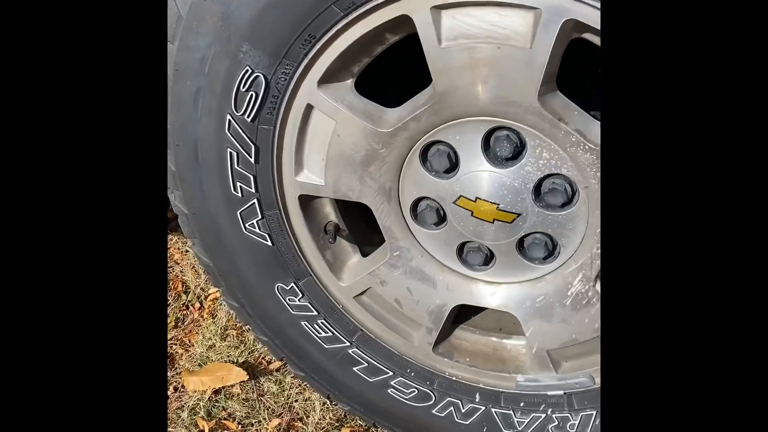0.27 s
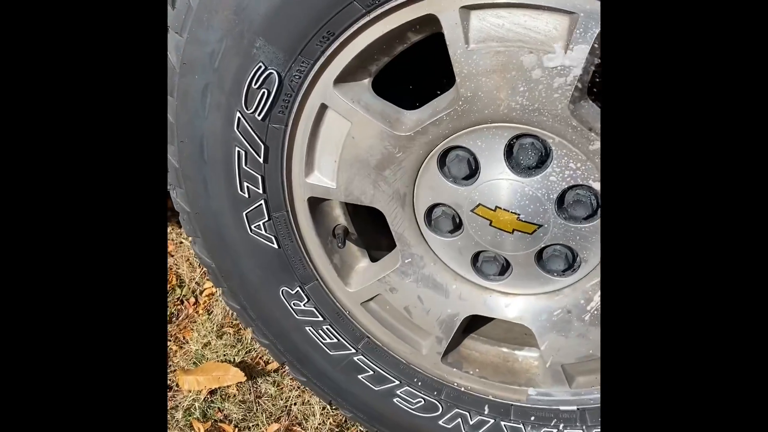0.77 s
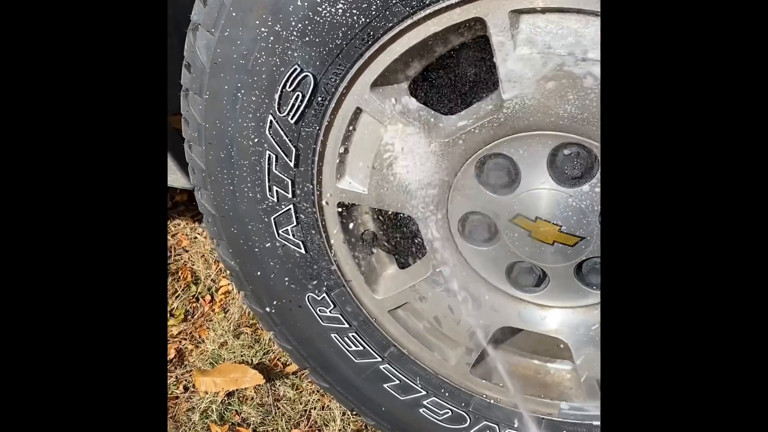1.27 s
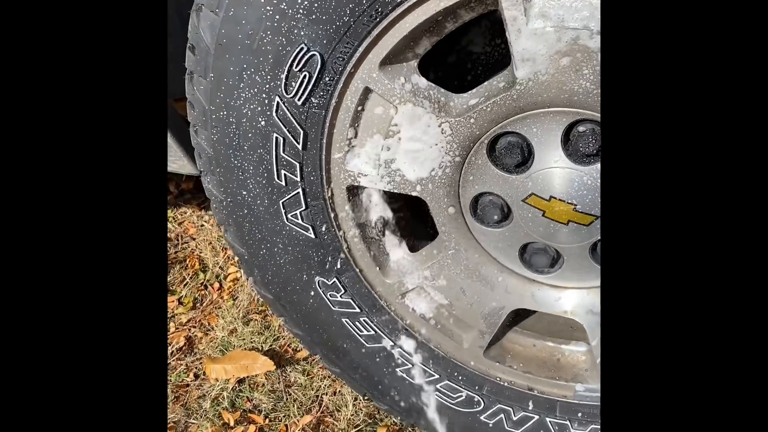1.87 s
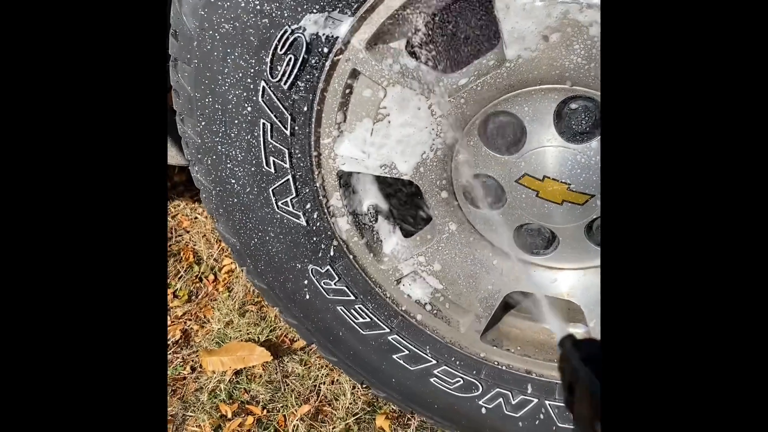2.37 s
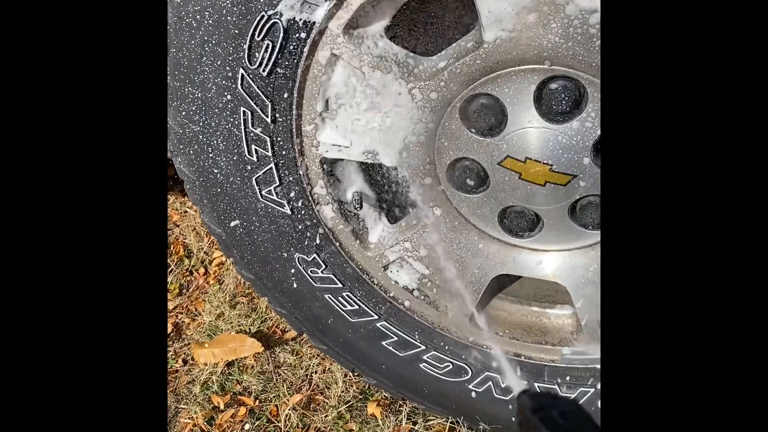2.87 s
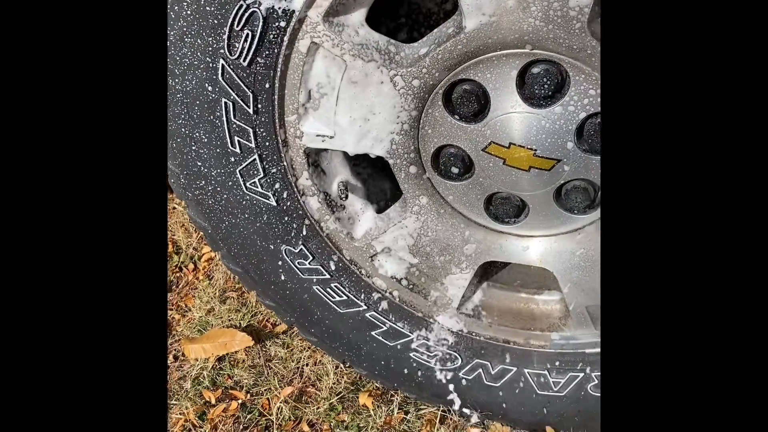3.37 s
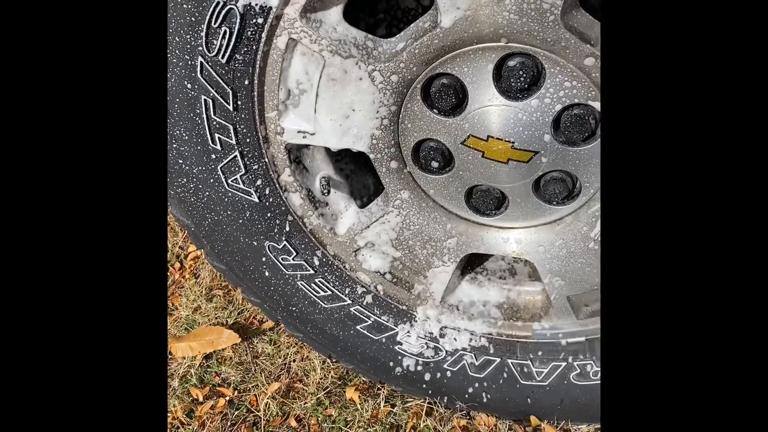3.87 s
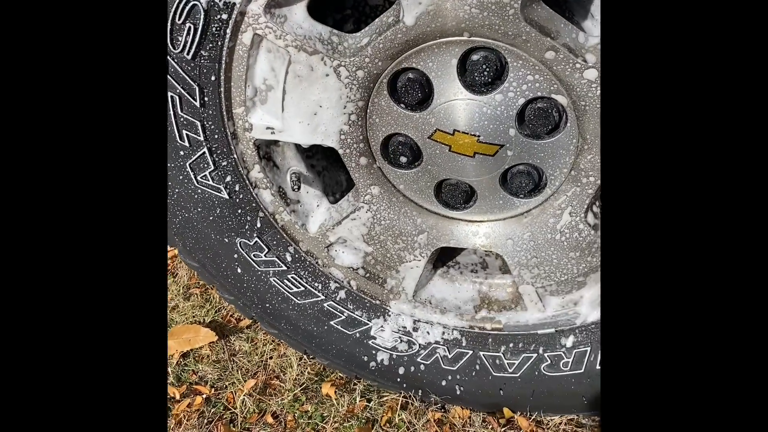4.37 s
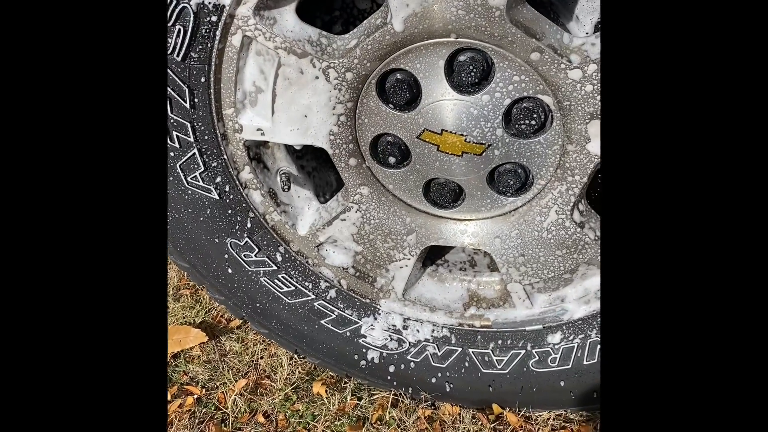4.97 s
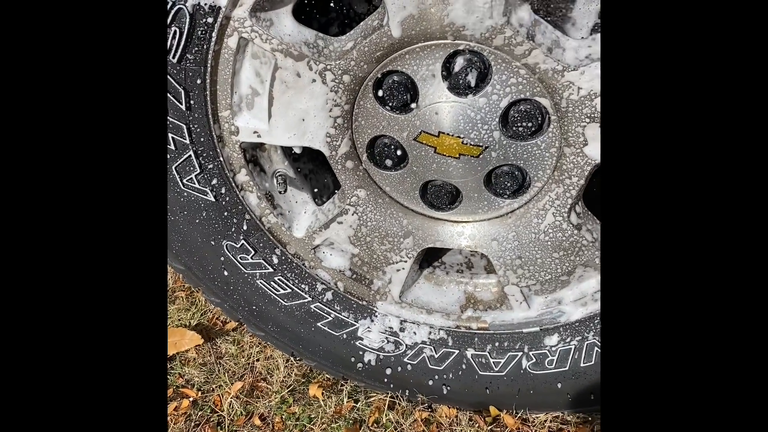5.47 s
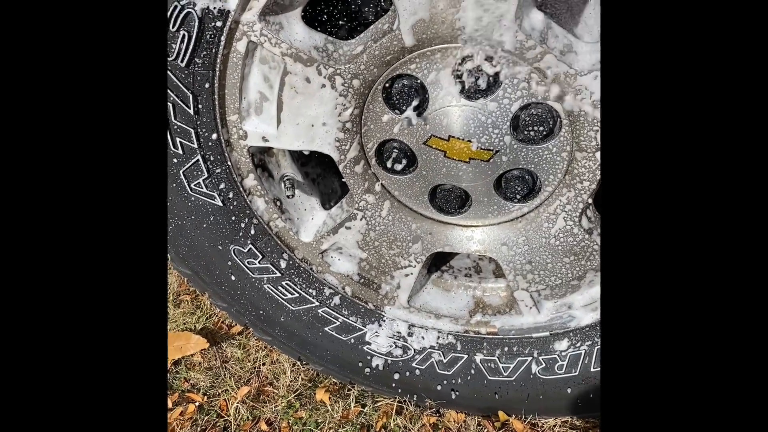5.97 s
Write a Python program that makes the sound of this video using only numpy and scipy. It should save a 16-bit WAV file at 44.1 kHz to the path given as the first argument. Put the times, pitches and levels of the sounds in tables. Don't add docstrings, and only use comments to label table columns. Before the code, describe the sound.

Steady, quick spray squirts fill the foreground from start to end: crisp bursts of hiss, grainy droplets hitting a car wheel, hollow plastic knocks and bright little ticks as the trigger springs back. Foam fizzes softly in the gaps. Behind, a low engine rumble swells in the second half with some tyre roar around the middle. Wind buffets the stereo phone microphones, strongest in the first second. Dry, open-air, close sound.

```python
import sys
import numpy as np
from scipy import signal
from scipy.fft import rfft, irfft
from scipy.io import wavfile
from scipy.ndimage import uniform_filter1d

SR = 44100
rng = np.random.default_rng(int(sys.argv[2]) if len(sys.argv) > 2 else 0)


def log_audio(samples):
    frames = np.atleast_2d(samples).T
    limited = np.clip(frames, -1, 1)
    pcm = np.round(limited * 32767).astype(np.int16)
    wavfile.write(sys.argv[1], SR, pcm)


def volts(x):
    e = np.asarray(x, float) / 20
    return 10 ** e


N = 274213


def rms_one(x):
    return x / np.sqrt(np.mean(x ** 2) + 1e-20)


def in_time(rows):
    s, *columns = np.transpose(rows)
    return [np.interp(np.arange(N) / SR, s, c) for c in columns]


def on_bins(points):
    hz, value = np.transpose(points)
    return np.interp(np.log(np.fft.rfftfreq(N, 1 / SR) + 1), np.log(hz), value)


def colour(x, spectrum):
    below, above = (spectrum[0][0] / 2, -80), (spectrum[-1][0] * 2, -80)
    closed = [below] + list(spectrum) + [above]
    return rms_one(irfft(rfft(x) * volts(on_bins(closed)), N))


def drift(rate):
    r = np.exp(-16 * np.pi * rate / SR)
    draws = rng.standard_normal(N // 8 + 4002)
    slow = signal.lfilter([1], [1, -2 * r, r * r], draws)[4000:]
    return np.interp(np.arange(N) / 8, np.arange(len(slow)), rms_one(slow))


# pitch_hz, likeness (0-1)
PORT_LIKENESS = [(40, 0.98), (100, 0.988), (250, 0.95), (700, 0.67), (1100, 0.68), (1900, 0.74),
                 (2800, 0.2), (3500, 0.45), (5000, 0.71), (6200, 0.97), (7400, 0.97), (9000, 0.66),
                 (10500, 0.73), (12000, 0.42), (13600, 1), (16000, 0.53)]


def pair():
    mid, side = rfft(rng.standard_normal((2, N)))
    alike = np.clip(on_bins(PORT_LIKENESS), 0, 1)
    return irfft(np.sqrt(1 + alike) * mid + np.sqrt(1 - alike) * side * [[1], [-1]], N)


def narrow(hz, width_hz):
    edges_hz = [hz - width_hz / 2, hz + width_hz / 2]
    band = signal.butter(2, edges_hz, "band", fs=SR, output="sos")
    return rms_one(signal.sosfilt(band, pair()))


def swell(s, width_s, far_db, near_db, power=2):
    return far_db + (near_db - far_db) * np.exp(-((np.arange(N) / SR - s) / width_s) ** power)


def even(x, size, slack):
    wander = uniform_filter1d(np.mean(x ** 2, axis=0), size=size)
    return x / np.sqrt((wander + slack) / (1 + slack))


# start_s, pressure_rise_s, hold_s, hiss_db
SQUIRTS = [(0.0, 0.00032, 0.081, -26), (0.199, 0.036, 0.1, -24), (0.45, 0.042, 0.083, -23),
           (0.679, 0.032, 0.099, -24), (0.917, 0.024, 0.091, -22.5), (1.129, 0.036, 0.087, -22.5),
           (1.364, 0.023, 0.081, -24.5), (1.575, 0.025, 0.1, -25.0), (1.811, 0.039, 0.073, -23),
           (2.04, 0.024, 0.09, -23), (2.251, 0.048, 0.09, -23), (2.492, 0.049, 0.057, -21.5),
           (2.727, 0.038, 0.099, -23), (2.961, 0.039, 0.08, -23.5), (3.176, 0.058, 0.073, -26),
           (3.408, 0.047, 0.09, -26), (3.656, 0.029, 0.09, -27), (3.871, 0.053, 0.065, -25),
           (4.095, 0.054, 0.076, -26), (4.345, 0.027, 0.095, -25.5), (4.595, 0.03, 0.104, -24.5),
           (4.838, 0.032, 0.103, -25), (5.098, 0.022, 0.1, -24.5), (5.324, 0.029, 0.09, -24.5),
           (5.548, 0.044, 0.097, -27.5), (5.802, 0.032, 0.089, -24), (6.033, 0.055, 0.085, -23.5)]
# extra_shut_off_s, foam_left_db
AFTER_SQUIRT = [(-.004, -2), (-.003, 0), (0.001, -2), (0.001, 0), (0.001, 0), (0.001, 0), (0.001, 0),
                (-.004, 0), (-.006, 0), (-.006, 0), (-.003, 0), (-.004, 0), (0.001, -3), (0.001, 0),
                (0.001, 0), (-.002, 0), (0.001, 0), (0.001, 0), (0.001, 0), (-.003, 0), (-.004, -4),
                (0.001, 0), (-.002, 0), (-.008, -2), (0.001, -4), (-.004, 0), (0.001, 0)]


def fall_s():
    hold_s = np.transpose(SQUIRTS)[2]
    return 0.044 - 0.66 * (hold_s - 0.079) + np.transpose(AFTER_SQUIRT)[0]


# time_s, spatter_db (re the hiss)
AIM = [
    (0, -13.5),
    (.5, -18.5),
    (1.7, -16),
    (3.5, -12.5),
    (4.7, -15.5),
    (5.5, -10),
    (6.22, -10.5),
]


def pressure(start_db, shoulder_db, dribble_s, dribble_db):
    t, shape = np.arange(N) / SR, np.full(N, -70.)
    for (s, rise, hold, _), fall in zip(SQUIRTS, fall_s()):
        end = s + rise + hold
        shut = end + fall
        corners = [s - .003, s, s + rise, s + rise + hold / 2,
                   end, shut, shut + dribble_s, shut + 2 * dribble_s]
        levels = [-60, start_db, shoulder_db, 0, shoulder_db, start_db, dribble_db, -50]
        a, b = max(int((s - .01) * SR), 0), int(corners[-1] * SR)
        shape[a:b] = np.maximum(shape[a:b], np.interp(t[a:b], corners, levels))
    starts, *_, top_db = np.transpose(SQUIRTS)
    which = np.clip(np.searchsorted(starts - .01, t) - 1, 0, None)
    return uniform_filter1d(shape, size=70), top_db[which], in_time(AIM)[0]


# pitch_hz, density_db (per Hz)
HISS = [(3000, -16), (5000, -10), (6500, -4.5), (8800, 0), (11000, -3.5), (13500, -6), (15300, -2),
        (16500, -8)]
# pitch_hz, density_db (per Hz)
SPATTER = [(700, -14), (1500, 5.5), (2500, 11.5), (3500, 6), (4700, 14), (6000, 14), (8000, -20)]


def jet():
    t = np.arange(N) / SR
    shape_db, top_db, spatter_db = pressure(start_db=-22.0, shoulder_db=-1.5, dribble_s=0.011, dribble_db=-27)
    sputter_db = np.clip(-0.2 - 0.24 * shape_db, 0, 6) * drift(120)
    flutter_db = 0.89 * drift(25) + 0.61 * drift(500)
    hiss = volts(top_db + 1.8 + shape_db + sputter_db + flutter_db) * colour(pair(), HISS)
    drops = volts(1.1 * drift(370) + 1.9 * drift(34) + 0.26 * sputter_db)
    landing_db = np.maximum(shape_db, np.interp(t - .006, t, shape_db))
    landing_db = 0.22 * landing_db + .55 * np.minimum(landing_db + 11.0, 0)
    spatter = volts(top_db + spatter_db + 0.4 + landing_db) * colour(pair() * drops, SPATTER)
    return hiss + spatter


# pitch_hz, density_db (per Hz)
FIZZ = [(1500, -5.5), (2500, 1), (4000, 3.5), (5800, -0.5), (8000, 1.5), (11000, -2.5), (16000, -1)]


def foam():
    t = np.arange(N) / SR
    starts, rise, hold, _ = np.transpose(SQUIRTS)
    last = np.clip(np.searchsorted(starts, t) - 1, 0, None)
    since_s = np.maximum(t - (starts + rise + hold + fall_s())[last], 0)
    left_db = uniform_filter1d(np.transpose(AFTER_SQUIRT)[1][last], size=200)
    settled_db = np.minimum(82 * since_s, 5.0)
    fizz_db = -46 + 0.13 * t - settled_db + left_db
    bubbles_db = 2.5 * drift(200) + 2 * drift(30)
    return volts(fizz_db + 2.5) * colour(pair() * volts(bubbles_db), FIZZ)


# time_s, shift_db (from deepest throb to upper orders)
LOAD = [
    (0, 0.5),
    (2.4, 0.5),
    (3.3, 3.5),
    (3.9, 2.5),
    (4.4, 0.5),
    (4.9, -1.5),
    (5.5, -1),
    (6.22, -2.5),
]


def rumble_bands(x):
    deep = signal.butter(3, 50, "low", fs=SR, output="sos")
    upper = signal.butter(3, [80, 170], "band", fs=SR, output="sos")
    low, high = signal.sosfiltfilt(deep, x), signal.sosfiltfilt(upper, x)
    load_db = in_time(LOAD)[0]
    out = 0
    for part, share in [(low, -1.6), (x - low - high, -.6), (high, 1.1)]:
        out = out + volts(share * load_db) * part.std() * even(rms_one(part), size=9000, slack=.1)
    return out


# pitch_hz, density_db (per Hz)
RUMBLE = [(25, -57), (40, -17.5), (65, 2.5), (80, -2.5), (110, -5), (160, -15), (250, -22), (400, -40)]
# time_s, rumble_db
ENGINE = [(0, -33), (.6, -38.5), (1, -31), (1.6, -39.5), (2, -32), (2.4, -39), (2.65, -29.5), (2.78, -40),
          (2.9, -31.5), (3.6, -28), (4.1, -26), (4.6, -25.5), (5.2, -24), (5.6, -26.5), (5.8, -30),
          (5.95, -28.5), (6.22, -30)]
# pitch_hz, density_db (per Hz)
ROAR = [(250, -0.5), (500, 6.5), (700, 8), (1000, 9), (1500, 3), (2200, -3.5), (3500, -11.5), (6000, -118)]
# nearest_s, swell_s, far_db, near_db
ROAR_PASS = (3.5, 0.63, -48, -42.5)
# pitch_hz, width_hz
WHINE = [(943, 100), (1598, 45), (1493, 95)]
# nearest_s, swell_s, far_db, near_db
WHINE_PASS = [(3.4, 0.35, -54, -54), (3.4, 0.33, -72, -45), (3.6, 0.7, -68, -51)]
# nearest_s, swell_s, far_db, near_db
GROWL_PASS = (3.5, .5, -54, -33.5)
# nearest_s, swell_s, far_db, near_db
HUM_PASS = (4.5, .5, -54, -38)


def street():
    beat_db = 2.86 * drift(27) + 0.55 * drift(3.8)
    rumble = volts(in_time(ENGINE)[0] + 1.0 + beat_db) * rumble_bands(colour(pair(), RUMBLE))
    roar = volts(swell(*ROAR_PASS) + 4.0) * colour(pair(), ROAR)
    whine = 0
    for (hz, width_hz), moment in zip(WHINE, WHINE_PASS):
        whine = whine + volts(swell(*moment, power=4) + 3.9 * drift(5)) * narrow(hz, width_hz)
    growl = volts(swell(*GROWL_PASS)) * narrow(140, 41)
    hum = volts(swell(*HUM_PASS)) * narrow(207, 75)
    return rumble + roar + whine + growl + hum


# peak_s, peak_db, half_length_s
GUSTS = [(0.0, -20, 0.045), (0.073, -14.5, 0.022), (0.139, -24, 0.037), (0.238, -28.5, 0.032),
         (0.342, -21, 0.023), (0.803, -27, 0.074), (0.91, -28, 0.045), (0.994, -20.5, 0.024),
         (1.058, -23, 0.044), (1.092, -24, 0.04), (1.277, -24, 0.025), (2.504, -32.5, 0.097),
         (2.673, -27.5, 0.03), (3.297, -53, 0.058), (3.99, -62, .15), (4.153, -34, 0.044),
         (4.28, -24.5, 0.055), (4.503, -32.5, .07), (4.618, -28.5, 0.087), (4.85, -32, 0.081),
         (5.204, -35, 0.082), (5.634, -35.5, 1), (5.787, -55, 0.12)]
# pitch_hz, density_db (per Hz)
BUFFET = [(40, -3), (90, 3), (160, 3), (250, -2.5), (400, -9.5), (600, -17.5), (1000, -32)]


def wind():
    t = np.arange(N) / SR
    breeze_db, dies_db = -40, 24.5
    gusts = sum(volts(db - dies_db * np.abs(t - s) / half) for s, db, half in GUSTS)
    eddies = colour(pair() * volts(3.6 * drift(23.5)), BUFFET)
    eddies = eddies / np.sqrt(uniform_filter1d(np.mean(eddies ** 2, axis=0), size=1300) + 0.083)
    return volts(-2.5) * (volts(breeze_db) + gusts) * eddies


# start_s, peak_db, length_ms
SLAPS = [(0.068, -18, 1.0), (0.139, -20.5, 1.0), (0.244, -31, 1.0), (0.324, -29, 0.82), (0.344, -30, 0.87),
         (0.598, -29.5, 1.0), (0.702, -27, 0.79), (0.784, -22, 0.93), (0.808, -32, 1.0), (0.908, -27, 0.89),
         (0.987, -16, 0.84), (1.033, -23, 0.84), (1.069, -31, 0.73), (1.1, -18.5, 0.73), (1.272, -24, 0.89),
         (1.305, -31, 1.0), (2.497, -35, 0.71), (2.668, -17.5, 0.94), (4.291, -25, 1.0), (4.629, -27, 1.0)]


def slaps():
    t, out = np.arange(N) / SR, np.zeros(N)
    for (s, db, ms), sign in zip(SLAPS, rng.choice([-1, 1], len(SLAPS))):
        u = (t - s - .004) * 1000 / ms
        out += sign * volts(db + 2.0) * u * np.exp(-u ** 2 / 2)
    return out * volts([[.7], [-.7]])


# middle_s, half_length_s, level_db, brightness_db
DRIBBLES = [(.428, .025, -40, 0), (.385, .008, -43, 4), (1.088, .008, -46, 4), (1.327, .014, -40, -4),
            (2.456, .01, -45, 3), (2.477, .01, -36, -3), (3.165, .012, -40, 2), (3.866, .007, -44, -3),
            (4.567, .01, -41, -4), (4.854, .007, -35, -3), (5.073, .007, -46, -3), (5.717, .007, -38, 4),
            (5.757, .007, -37, -5), (6.022, .016, -40, 0), (.933, .007, -31, -5), (2.744, .007, -33, -5),
            (.12, .015, -44, -3), (.165, .02, -46, -4)]


def dribble():
    t = np.arange(N) / SR
    dull, bright = np.zeros((2, N))
    for s, half, db, bright_db in DRIBBLES:
        shape = volts(db) * np.exp(-((t - s) / half) ** 4)
        dull += shape
        bright += shape * volts(bright_db - 2.0)
    wet = pair() * volts(2.2 * drift(150))
    dull_wet = colour(wet, [(2000, -6), (4000, 0), (6000, 0), (7500, -6)])
    bright_wet = colour(wet, [(7000, -6), (9000, 0), (12000, -4), (16500, -4)])
    return dull * dull_wet + bright * bright_wet


# start_s, peak_db
TICKS = [(0.2084, -30), (0.463, -25), (0.536, -26), (0.69, -24), (2.973, -23), (0.1376, -31), (0.64, -34),
         (0.847, -30), (2.0677, -22), (5.1083, -24), (3.128, -30), (1.0844, -37), (1.1492, -15.5),
         (1.546, -28), (2.0389, -20), (2.2712, -13.5), (2.5085, -31), (2.7495, -14.5), (2.966, -27),
         (3.2036, -19.5), (3.362, -23), (3.4285, -27), (3.578, -43), (3.5959, -23), (3.6345, -29),
         (4.272, -21), (4.6034, -27), (4.777, -24), (5.8138, -19)]


def ticks():
    clicks = np.zeros(N)
    s, db = np.transpose(TICKS)
    clicks[(s * SR).astype(int)] = volts(db + 1.0)
    decay = volts(-60 / (0.0032 * SR))
    burst = signal.lfilter([1], [1, -decay], clicks + 1e-18)
    return burst * colour(pair(), [(3000, -4), (7000, 5.0), (16500, -21.0)])


# multiple (of lowest mode), level_db, t60_s
HEAD_MODES = [(1.006, 3.5, 0.027), (1.548, -23, 0.25), (3.2, -6.5, 0.026), (3.95, -10, 0.008)]
# pitch_hz, level_db, t60_s
UPPER_MODES = [(2200, 3.5, 0.015), (2510, -4, 0.029)]
# time_s, pitch_hz
GRIP = [(0, 1100), (1.8, 1116), (2.8, 1112), (3.7, 1146), (4.15, 1192), (4.9, 1125), (6.22, 1113)]
# start_s, peak_db, upper_modes_db, crack_db
PULLS = [(0.209, -29, -24, -1), (0.4723, -23, -9, 10), (0.677, -18, -7, 2), (0.9132, -13, -29, 3),
         (1.1268, -16.5, -19, 10), (1.3577, -15, -21, -3.5), (1.5695, -15.5, -34, 1),
         (1.8046, -18, -18, 3.5), (2.0305, -20, -14, -1), (2.254, -16.5, -12, 5), (2.5176, -26.5, -10, 9),
         (2.7288, -13, -17.5, -9), (3.1905, -19, -21, 8), (3.4102, -16, -23, 2), (3.6532, -18.5, -28, 3),
         (3.8764, -18, -22, 3), (4.1052, -19, -25, 4), (4.341, -20, -12.5, 4), (4.614, -21.5, -20, -4),
         (4.8355, -14.5, -24, 1), (5.0876, -15.5, -10, 6), (5.3209, -17.5, -1.5, 10), (5.544, -19, -4, 5),
         (5.795, -15, -13, -1), (6.0418, -16.5, -8.5, 5.5)]
# start_s, peak_db, upper_modes_db, crack_db
RETURNS = [(0.1384, -50, -17, 18), (0.383, -40.5, 6, -16), (0.62, -27.5, -3, -17), (0.846, -35, 3.5, 14.5),
           (1.0767, -28, -5.5, -12), (1.293, -32, -7, -13), (1.518, -37, -5, -8), (1.975, -26, -12, 0),
           (2.054, -24, -28, 2), (2.2, -30.5, -2, -13), (2.43, -26.5, -8, -5), (2.6714, -28.5, -15, 12.5),
           (2.8843, -28, -23, -11), (2.9035, -26.5, -9, -11), (3.899, -26.5, -24, 11),
           (4.2882, -25, -16, 7), (4.5172, -28, -8, -14), (4.5848, -35.5, -5, 12), (4.7811, -30.5, -6, 10),
           (5.024, -30.5, -4, 8), (5.2664, -25.5, -4.5, 5), (5.494, -30.5, 4, 11.5),
           (5.7283, -22, -11.5, -16), (5.8646, -35, -1, 6), (5.9785, -23, -4, 3), (6.0635, -24.5, -11, 6),
           (1.3802, -29, -15, 11), (1.747, -38, -5, 10), (3.8226, -27.5, -7, 6), (5.741, -29, -11, 5),
           (5.754, -31, 0, 0), (3.5898, -33, -2, 7)]
# delay_s, level_db
BOUNCES = [
    (.0022, -9.5),
    (.0055, -7.5),
    (.010, -8),
]


def trigger():
    t, out, clicks = np.arange(3000) / SR, np.zeros((2, N + 3000)), np.zeros((2, N))
    sides = volts([-1, 1])
    knocks = list(PULLS) + list(RETURNS)
    chance = rng.standard_normal((len(knocks), 2, 6))
    for (s, db, upper_db, crack_db), (louder, sharper) in zip(knocks, chance):
        low_hz = np.interp(s, *np.transpose(GRIP))
        modes = [(k * low_hz, d, t60) for k, d, t60 in HEAD_MODES]
        modes += [(hz, d + upper_db + 7.5, t60) for hz, d, t60 in UPPER_MODES]
        hz, level_db, t60 = np.transpose(modes)[:, :, None]
        above_lowest = np.arange(6)[:, None] > 0
        hz = hz * (1 + 0.035 * sharper[:, None] * above_lowest)
        rings = volts(level_db + 2.0 * louder[:, None] - 60 * t / t60) * np.sin(2 * np.pi * hz * t)
        knock = (rings * np.minimum(t * hz / 1.36, 1)).sum(axis=0)
        at = int(s * SR)
        out[:, at:at + len(t)] += np.outer(sides, volts(db - 6.5) * knock)
        clicks[:, at] = sides * volts(db + crack_db - 7.0)
        for (delay, bounce_db), late, loud in zip(BOUNCES, sharper, louder[::-1]):
            again = at + int(delay * (1 + .2 * late) * SR)
            clicks[:, again] = sides * volts(db + crack_db - 9.0 + bounce_db + 2.8 * loud)
    decay = volts(-60 / (.008 * SR))
    burst = signal.lfilter([1], [1, -decay], clicks + 1e-18)
    crack = colour(pair(), [(900, 18.5), (2000, 14), (3200, 15), (5000, 17), (8000, 7.5), (16500, -7.5)])
    return out[:, :N] + burst * crack


def refill():
    t, level = np.arange(N) / SR, np.zeros(N)
    for (s, rise, hold, db), fall in zip(SQUIRTS, fall_s()):
        suck_s = s + rise + hold + fall + .04
        level += volts(db - 26.5) * np.exp(-((t - suck_s) / 0.0073) ** 2)
    return level * volts(2.0 * drift(60)) * narrow(6160, 760)


# peak_s, length_s, level_db, pitch_hz, width_hz
SPLASH = [
    (6.136, 0.031, -30.5, 2250, 506),
    (6.19, 0.068, -38.5, 1640, 240),
    (6.186, 0.035, -33, 2800, 340),
    (6.201, 0.024, -38, 1860, 340),
]


def splash():
    out = 0
    for s, length, db, hz, width_hz in SPLASH:
        out = out + volts(swell(s, length, -83, db)) * narrow(hz, width_hz)
    return out


def scene():
    squirts = jet() + foam() + dribble() + ticks() + trigger() + refill() + splash()
    return squirts + street() + wind() + slaps()


def attacks(x, s, jump_db):
    treble = signal.sosfilt(signal.butter(2, 1500, "high", fs=SR, output="sos"), x)
    power = (treble[:, :N // 128 * 128] ** 2).reshape(2, -1, 128).sum(axis=(0, 2))
    before = np.r_[np.full(5, power[0]), uniform_filter1d(power, size=8)[:-5]]
    jumps = np.flatnonzero(power > before * 10 ** (jump_db / 10)) * 128 / SR
    return (np.abs(s[:, None] - jumps) < .015).any(axis=1)


# time_s, margin_db (under which a half is dropped), extra_right_lag (in 4/3 us)
MARGIN = [(0, 8.5, 0.9), (2, 6.5, 1.5), (3.9, 8.5, 0.9), (4.2, 5.5, 4), (6.22, 6, 1.5)]
# pitch_hz, added_db
MARGIN_BY_PITCH = [(1500, 30), (1900, 0), (2600, 1.5), (3400, 1), (5000, 1.5), (6300, 2), (7500, 0.3),
                   (10500, -4.5), (12700, -3), (14200, -2), (16000, 2.5)]
# time_s, pitch_hz, width_hz
THIN_SUM = [(0, 3900, 350), (1.2, 3900, 350), (2.4, 4100, 250), (2.8, 4300, 100), (3.9, 4300, 100),
            (4.3, 3700, 350), (5, 3200, 260), (6.22, 3050, 260)]


def joint_stereo(x):
    window = np.sin(np.pi * (np.arange(2048) + .5) / 2048)
    hz, s, (left, right) = signal.stft(x, SR, window, nperseg=2048, noverlap=1024)
    times, margin_db, lag_us = np.transpose(MARGIN)
    hand = drift(6)[np.minimum(s * SR, N - 1).astype(int)]
    sway_us = np.interp(s, times, lag_us) + 1.1 * hand
    right = right * np.exp(-2j * np.pi * np.outer(hz, sway_us) / 750000.0)
    both = np.array([left + right, left - right]) / 2

    power = (np.abs(both[:, :1024]) ** 2).reshape(2, 64, 16, -1).sum(axis=2) + 1e-20
    power[:, 16:] = np.repeat(power[:, 16::2] + power[:, 17::2], 2, axis=1)
    lead_db = 10 * np.log10(power[0] / power[1])
    treble_db = 10 * np.log10(power[:, 10:].sum(axis=(0, 1)))
    sudden = (np.abs(np.gradient(treble_db)) > 6.8) | attacks(x, s, jump_db=8)

    band_hz = hz[8:1024:16]
    masked_db = 5.5 * np.outer(band_hz < 5200, treble_db > treble_db.max() - 9)
    pitch, added_db = np.transpose(MARGIN_BY_PITCH)
    pitch_db = np.interp(np.log(band_hz), np.log(pitch), added_db)
    margin_db = np.interp(s, times, margin_db) + pitch_db[:, None] + 60 * sudden - masked_db
    when, thin_hz, width_hz = np.transpose(THIN_SUM)
    near = np.exp(-((hz[:, None] - np.interp(s, when, thin_hz)) / np.interp(s, when, width_hz)) ** 2)
    spared_db = masked_db * (1 - 2.3 * near[8:1024:16])
    both[0, :1024] *= np.repeat(lead_db > -margin_db - spared_db, 16, axis=0)
    both[1, :1024] *= np.repeat(lead_db < margin_db, 16, axis=0)
    both *= ~np.outer(hz > 15850, ~attacks(x, s, jump_db=15))

    lines = uniform_filter1d(uniform_filter1d(np.abs(both) ** 2, size=4, axis=1), size=2, axis=2)
    around = uniform_filter1d(np.sum(np.abs(both) ** 2, axis=0) / 2, size=40, axis=0)
    hissing = (treble_db > np.median(treble_db) - 2) & ~sudden
    starved = np.outer((hz > 2300) & (hz < 4700), hissing)
    floor_db = -2.5 + np.array([2.5 * near, 0 * near])
    both *= ~(starved & (lines < around * 10 ** (floor_db / 10)))
    ports = [both[0] + both[1], both[0] - both[1]]
    return signal.istft(ports, SR, window, nperseg=2048, noverlap=1024)[1][:, :N]


def top_cut(x):
    return signal.sosfilt(signal.butter(12, 17100, fs=SR, output="sos"), x)


# pitch_hz, lag_turns
TRAIL = [(300, 0), (900, -0.26), (2000, 0.096), (2700, .2), (3450, 0.204), (4300, 0.25), (5200, 0.11),
         (7400, 0.489), (10400, 0.94), (13600, 1.48), (16000, 1.77)]


def record(dry):
    late = irfft(rfft(dry[1]) * np.exp(-2j * np.pi * on_bins(TRAIL)), N)
    top = signal.cheby2(12, 50, 16300 * 1.028, fs=SR, output="sos")
    ports = signal.sosfilt(top, np.array([dry[0], late]))
    mix = joint_stereo(ports)
    return top_cut(mix)


dry = scene()
out = record(dry)
log_audio(out)
```